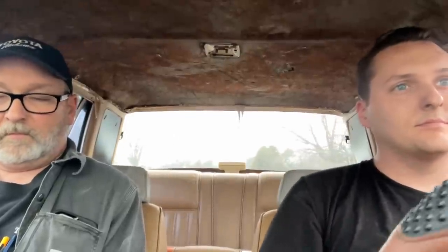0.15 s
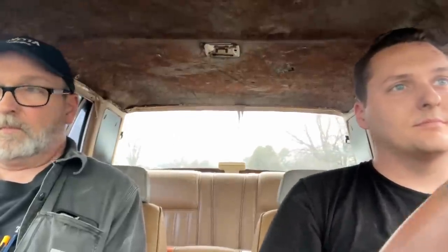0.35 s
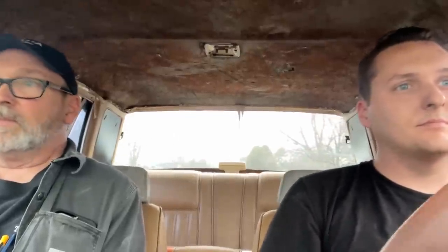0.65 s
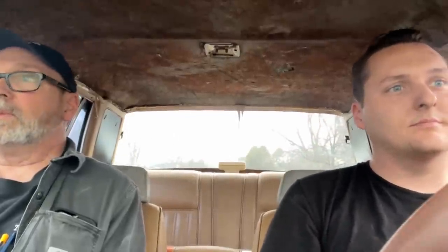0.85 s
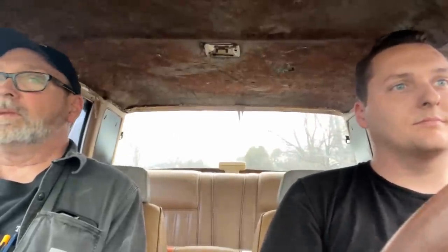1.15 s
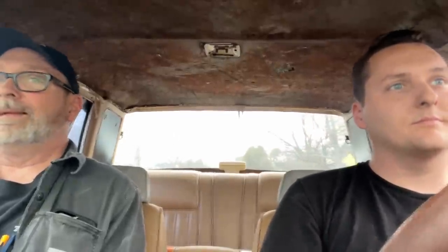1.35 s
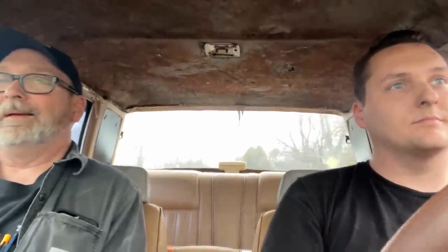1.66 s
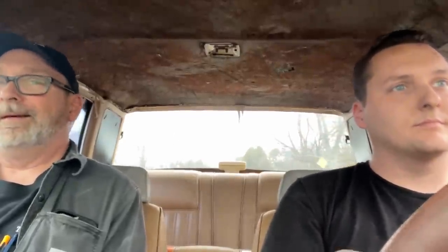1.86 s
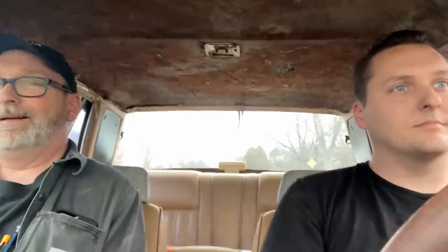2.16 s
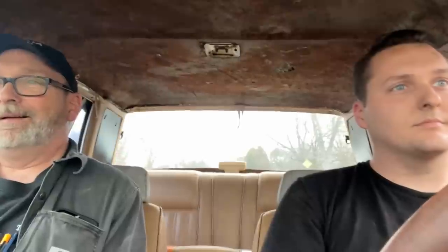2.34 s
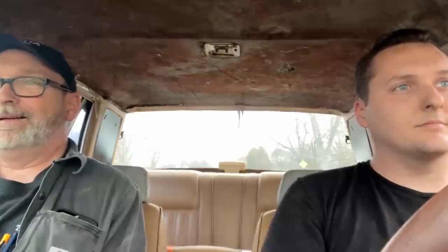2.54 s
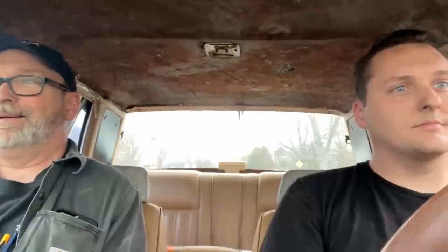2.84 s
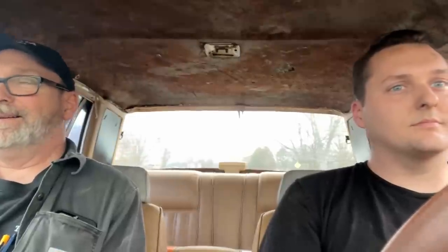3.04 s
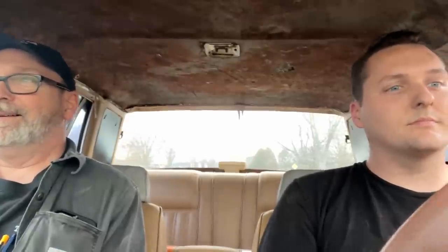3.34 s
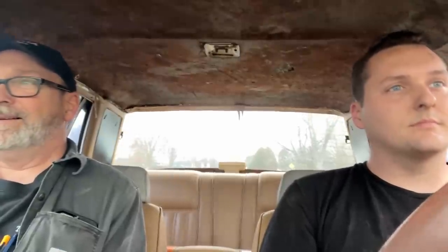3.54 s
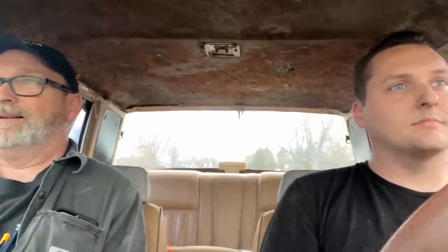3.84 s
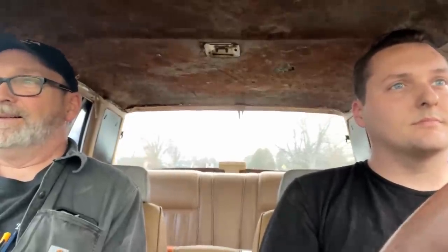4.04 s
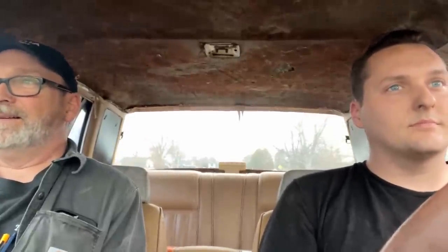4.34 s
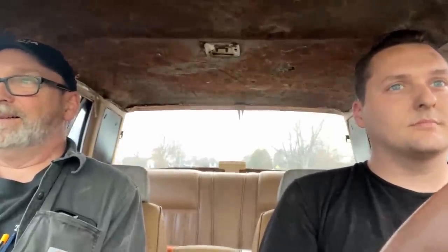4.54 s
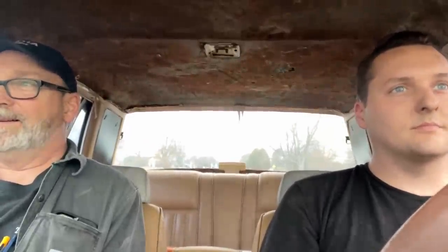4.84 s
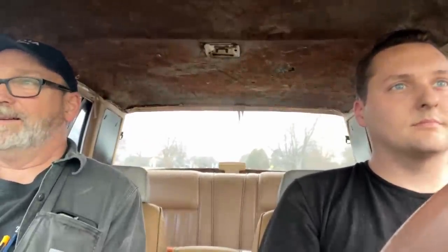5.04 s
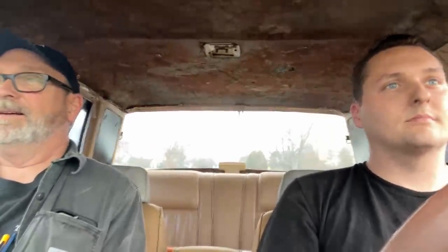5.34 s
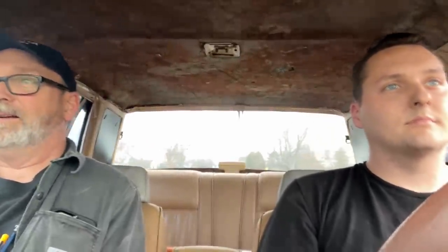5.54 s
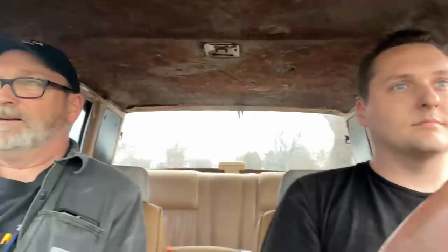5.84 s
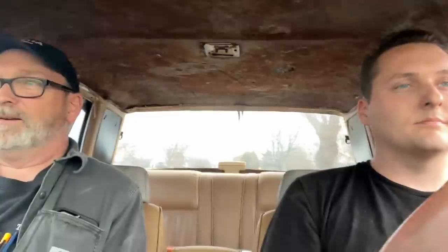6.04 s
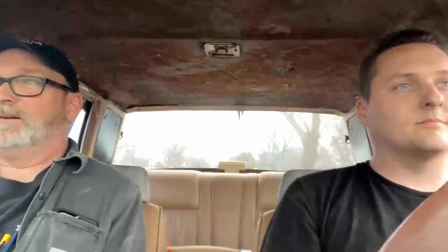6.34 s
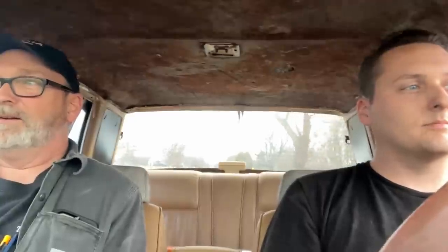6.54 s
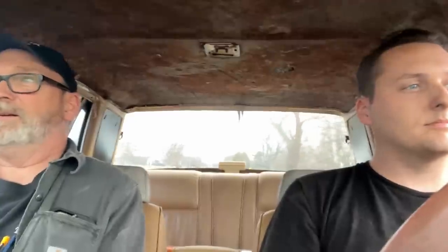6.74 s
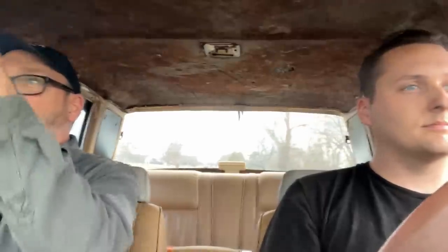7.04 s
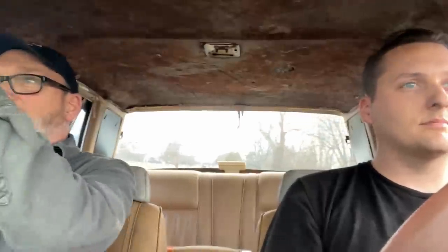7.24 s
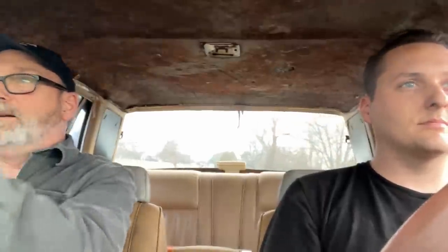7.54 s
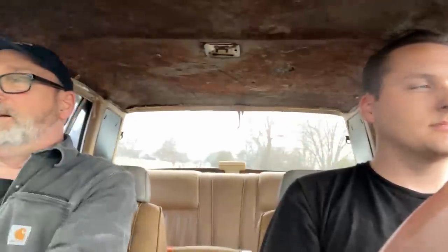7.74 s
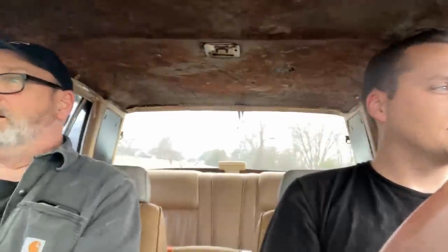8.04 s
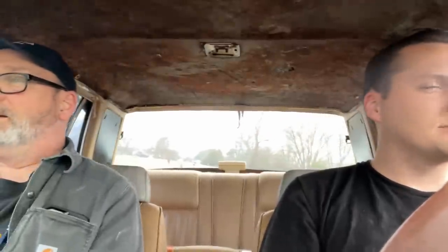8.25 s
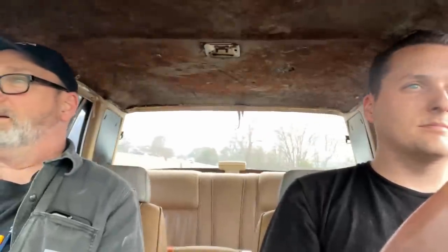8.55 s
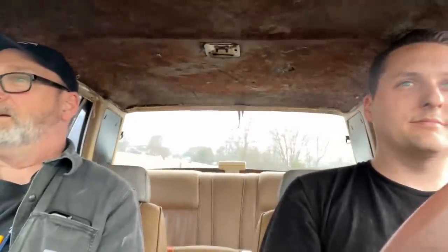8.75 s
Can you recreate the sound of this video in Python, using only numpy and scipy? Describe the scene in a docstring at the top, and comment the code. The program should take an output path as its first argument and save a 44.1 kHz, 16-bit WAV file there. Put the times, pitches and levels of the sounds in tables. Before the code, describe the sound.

Heard from inside the boxy, worn cabin of an old eight-cylinder car, in wide close stereo. From 0 s the engine labours at low revs: a deep, almost pure boom, lumpy uneven rumble, dull body knocks and a leaky exhaust joint puffing and ticking about eleven times a second. The hardest puffs come in the first second. Revs climb steadily, nearly doubling in pitch by 4.9 s; the puffs run closer together into a rough flutter and the growl thickens. Between 4.9 and 5.25 s the gear changes up: pitch slides down quickly by over a third and the boom ducks briefly. From 5.3 s the engine pulls again, gentler and with less hiss, creeping up slowly until the end near 8.9 s, with a few stronger puffs around 6, 7.3 and 8.1 s. Low, slowly patchy road rumble lies underneath throughout, swelling slightly near the end.

```python
"""Inside the cabin of an old eight-cylinder car that pulls away, changes up one gear and pulls on more gently.
For five seconds the revs climb: the firing rate booms as a near sine, uneven cylinders rumble on the other
multiples of the engine cycle, a leaky exhaust joint puffs and ticks once a cycle, and firings knock the body.
At the change the revs fall and the boom ducks; then all climbs again, slower, with a gentler rumble balance.
Road noise, filtered and slowly patchy, fills the gaps throughout."""
import sys
import numpy as np
from scipy import signal
from scipy.fft import rfft, irfft, next_fast_len
from scipy.io import wavfile

SR = 44100
rng = np.random.default_rng(int(sys.argv[2]) if len(sys.argv) > 2 else 0)


def put_to_file(sound):
    """Save the sound as 16-bit audio at rate SR, in the file named by the first command-line argument."""
    columns = np.atleast_2d(sound).T  # one column per channel
    safe = np.clip(columns, -1, 1)
    whole_steps = np.round(safe * 32767)
    wavfile.write(sys.argv[1], SR, whole_steps.astype(np.int16))


N = 392049

# engine speed: (time [s], speed [cycles per s])
SPEED = [(0, 10.7), (.2, 10.5), (.5, 11.05), (.8, 11.71), (1, 12.51), (1.2, 12.82), (1.6, 13.8),
         (2.4, 15.63), (2.8, 16.45), (3.8, 18.86), (4.87, 21.04), (5, 20.17), (5.12, 18.38), (5.18, 16.43),
         (5.245, 13.6), (5.3, 13.55), (5.42, 13.68), (6.1, 14.07), (6.85, 14.61), (8.5, 15.61),
         (8.89, 15.75)]
START_CYCLE = -.117   # where the crank stands at the start [cycles]


def crank(now):
    """The engine speed, and the crank position as its running sum in cycles."""
    speed = np.interp(now, *np.transpose(SPEED))
    cycle = START_CYCLE + np.cumsum(speed) / SR
    return cycle, speed


# the drive: (time [s], load on the boom [dB], rumble level [dB], hiss level before a 6 dB lift [dB])
DRIVE = [(0, -1.5, -1.5, -43), (0.499, -3.5, -2, -43.5), (0.901, -4, -5.5, -46), (1.301, -2, -1.5, -44.5),
         (1.9, -1, -3.5, -47), (2.6, 1, 1.2, -46), (3.399, 9, 1.5, -46), (3.698, 4, 0.5, -44.5),
         (4.3, 9, 0.5, -45), (4.901, 6, -1, -43.5), (5.077, 6.5, -1, -45), (5.181, -15, -0.5, -49.5),
         (5.26, -5, -5.5, -50), (5.499, -3.5, -5, -49.5), (6.501, -3.5, -5, -49.5), (7.801, -3, -3, -48.5),
         (8.2, -4, -1.2, -49), (8.89, -9, -0.5, -49)]


def drive(now):
    """Effort of the engine as three level curves in dB: boom load, rumble and hiss."""
    time, *columns = np.transpose(DRIVE)
    return [np.interp(now, time, column) for column in columns]


# strength of each firing in order: [share]
CYLINDERS = [.89, .5, 1.09, 1.2, .88, .65, .78, .72]
# what the cabin makes of the firing rate; it swallows the boom near 128 Hz:
# (frequency [Hz], level alike in both ears [dB], level in opposition [dB], lead of the opposed part [rad])
BOOM = [(74.5, -14, -37, 2.5), (92.8, -8, -30.5, -9.5), (113.8, -13.5, -38, -1), (119.2, -16.5, -36, -0.5),
        (125.74, -25, -34.5, 0.2), (126.8, -37.5, -31, -1), (134, -35, -32, -2.5), (142, -34.5, -37, -3),
        (154.3, -28.5, -45, -1), (150, -30, -38, -4), (163, -33.5, -35, 1)]
# the boom leads its neighbouring lines: (frequency [Hz], lead [rad])
BOOM_TURN = [(90, 1.5), (102, 2), (123, 1.5), (130, 2.2), (141, 1.9), (147, 2.5), (153, 3.6)]
# the cabin's resonances delay each pitch, for boom and rumble: (frequency [Hz], phase [rad])
CABIN_TURN = [(30.0, 6.6), (60.0, 7.2), (90.0, 3.3), (110.0, -0.8), (125.0, -3.9), (140.0, -3.4),
              (155.0, -6.9), (185.0, -10.1), (207.0, -15.0), (225.0, -23.1), (245.0, -24.9), (265.0, -28.3),
              (285.0, -30.1), (310.0, -33.1), (340.0, -38.6), (375.0, -40.2), (400.0, -39.7),
              (430.0, -39.4), (470.0, -32.8), (510.0, -42.5), (555.0, -43.3), (600.0, -46.7),
              (800.0, -70.6)]


def boom(cycle, speed, load_db):
    """Eight firings a cycle: a near sine that stands in the cabin."""
    hz = len(CYLINDERS) * speed
    boom_hz, *columns = np.transpose(BOOM)
    mid_db, side_db, lead = [np.interp(hz, boom_hz, column) for column in columns]
    turn = 2 * np.pi * len(CYLINDERS) * cycle + at_hz(CABIN_TURN, hz) + at_hz(BOOM_TURN, hz)
    # load and drift move only the part alike in both ears
    mid = from_db(mid_db + load_db + 0.56 * drift(7.9)) * np.cos(turn)
    side = from_db(side_db) * np.cos(turn + lead)
    return np.sqrt(2) * np.array([mid + side, mid - side])


# speeds at which the hard-pulling rumble is set: [cycles per s]
RUMBLE_SPEEDS = [11, 16, 21]
# lines besides the firing rate, relative to the cabin spectra: (multiple of the engine cycle,
# level pulling hard at each of the three RUMBLE_SPEEDS [dB], level pulling gently [dB])
RUMBLE = [(2, -2.3, 4, -1, -4.5), (3, -5, -0.5, -11, -6.5), (4, -2, -4.5, -1, -10), (5, 3.5, 4, 6.5, 3),
          (6, -2.5, -1.5, 4.5, -2.5), (7, -7, 6, -2, 2), (9, 2, 2.5, 2, 1), (10, -4, -15.5, 8, -10.5),
          (11, 4, 3, 4.5, 3.5), (12, -0.5, 1.5, 2, 1.6), (13, 4.5, 6.5, 10.5, 5.5), (14, -3.5, -3, 5, 0.2),
          (15, 3.9, -1.8, -3, 6.5), (16, 0, 7.5, 0.8, 1.9), (17, -5, 3.5, -14, 2), (18, -5, -2.5, 0.2, -6),
          (19, 12.5, -3, 1.5, -1.5), (20, 6, -18.5, -12.5, -8.5), (21, 2, 4.5, 4, 4.1),
          (22, 6.5, -3.5, 2, -2.5), (23, 3.5, -6, -5.5, -5), (24, 2, 4.8, -4.5, 2.9),
          (25, -3, -6.6, -0.5, -3), (26, -3.0, 1, -2.5, -5), (27, 1.6, -7, 1.8, 0.5),
          (28, -3.5, -4, 0.5, -9), (29, -4.5, 1, 11, 0.5), (30, -2, -2, 9.5, -1.6),
          (31, -13, -3.2, 10, -7.5), (32, -20.5, -3, 3.1, -3.5), (33, 0, -6, -4, -0.5),
          (34, 2.5, -7, 11, -8.5), (35, -3.7, -3.5, 14, -4), (36, 4.5, -3, 16, -4.2),
          (37, -5, -11.5, 3, -0.5), (38, -5, 2.5, 16.5, 4.5), (39, -12.5, -0.2, 11, 2.2),
          (40, 7, 4, 8, 2.5), (41, 5.7, 2.5, 15, 2.5), (42, -3.2, 7.5, 8, 1), (43, -10, 1.5, 9, 5),
          (44, -2, 2.5, 12, 3.5), (45, -1.5, -6.3, -7, -9), (46, -4, 0, -7.5, 0.5), (47, 3, 2.5, 5.5, 3.5),
          (48, -4, -3, -2.5, -1.5), (49, 1, 14, -6, 10), (50, 1, 15.5, -12, 9)]
# what the cabin passes to both ears alike: (frequency [Hz], level [dB])
CABIN_MID = [(30.0, -55.5), (45.0, -49), (60.0, -36), (75.0, -37), (90.0, -30), (105.0, -29.0),
             (125.0, -42.5), (140.0, -39.5), (155.0, -35), (172.0, -39.5), (190.0, -39), (207.0, -46),
             (225.0, -47), (245.0, -45.5), (262.0, -38), (280.0, -38), (300.0, -42), (325.0, -45),
             (350.0, -46.5), (380.0, -43), (410.0, -54.5), (440.0, -51.5), (470.0, -55.5), (500.0, -71.5),
             (530.0, -58.5), (555.0, -54.5), (590.0, -72.5), (630.0, -68), (680.0, -73), (730.0, -72),
             (775.0, -71.5), (830.0, -82), (900.0, -79.5), (970.0, -81.5), (1050.0, -79)]
# what it passes to the ears in opposition: (frequency [Hz], level [dB])
CABIN_SIDE = [(30.0, -74.5), (45.0, -63), (60.0, -61.5), (75.0, -51), (90.0, -48), (105.0, -39),
              (125.0, -45.5), (140.0, -45), (155.0, -39.5), (172.0, -41.5), (190.0, -40.5), (207.0, -45.5),
              (225.0, -48), (245.0, -54.5), (262.0, -56.5), (280.0, -52.5), (300.0, -50.5), (325.0, -42),
              (350.0, -40), (380.0, -49), (410.0, -45.5), (440.0, -46.5), (470.0, -49.5), (500.0, -49.5),
              (530.0, -51), (555.0, -49), (590.0, -61.5), (630.0, -66), (680.0, -58.5), (730.0, -62.5),
              (775.0, -64), (830.0, -67.5), (900.0, -72), (970.0, -60), (1050.0, -56)]
# lead of the opposed part: (frequency [Hz], lead [rad])
SIDE_LEAD = [(75, -1.5), (95, -2.1), (125, -.9), (140, -2.7), (165, -1.8), (200, -2.7), (225, -4.1),
             (290, -4.5), (350, -4.9), (380, -1.4), (420, -3.6), (500, -3.1), (555, -1.1)]
SHIFT_S = 5.2   # the higher gear takes hold [s]


def rumble(cycle, speed, level_db):
    """Unequal firings put a line on other multiples of the cycle; firing pattern and cabin set their phases."""
    pattern = np.angle(np.fft.fft(CYLINDERS))
    step = 8   # the lines are low, so build them at an eighth of the sample rate
    cycle, speed = cycle[::step], speed[::step]
    mid, side = 0, 0
    gentle = np.interp(np.arange(0, N, step) / SR, [SHIFT_S - .1, SHIFT_S + .1], [0, 1])
    for k, *hard_db, gentle_db in RUMBLE:
        k = round(k)
        hz = k * speed
        hard_db = np.interp(speed, RUMBLE_SPEEDS, hard_db)
        line_db = hard_db + gentle * (gentle_db - hard_db)
        # no two cycles burn alike, the high lines show it most
        line_db = line_db + (.4 + .03 * k) * drift(3.0, step)
        waver = .004 * k * drift(4, step)
        turn = 2 * np.pi * k * cycle + pattern[k % 8] + at_hz(CABIN_TURN, hz) + waver
        mid = mid + from_db(line_db + at_hz(CABIN_MID, hz)) * np.cos(turn)
        side = side + from_db(line_db + at_hz(CABIN_SIDE, hz)) * np.cos(turn + at_hz(SIDE_LEAD, hz))
    both = signal.resample_poly([mid + side, mid - side], step, 1, axis=1)[:, :N]
    return np.sqrt(2) * from_db(level_db) * both


# colour of the hiss, relative: (frequency [Hz], level per Hz [dB])
HISS = [(290, -29.5), (500, -2.5), (610, -5.5), (777, -2.5), (1020, -12), (1350, -6.5), (1540, -15),
        (2430, -14), (2900, -18.5), (3920, -22.5), (5600, -21.5), (6600, -28), (7420, -29), (8490, -18),
        (9300, -36.5), (10500, -65), (13000, -73), (14500, -43)]
# how much each puff lifts the hiss at full depth, and how it lingers:
# (frequency [Hz], lift [dB], delay [cycles], fall [cycles])
PUFF_LIFT = [(500, 15.5, -0.015, 0.66), (895, 13.5, -0.082, 0.1), (1400, 12, -0.067, 0.26),
             (2400, 8.5, -0.0064, 1), (3800, 16.5, -0.0088, 0.36), (5950, 13, 0.089, 0.49),
             (8600, 9.5, 0.11, 0.057)]
# puffs stand out less at high revs, where they run together: (speed [cycles per s], depth [share])
PUFF_DEPTH = [(10, 0.53), (14, 0.55), (17.5, 0.49), (21, 0.31)]
# the hardest puffs: (time [s], peak level that sets their extra strength [dB])
HARD_PUFFS = [(0.1062, -30.5), (0.3925, -30), (0.6584, -29.5), (0.834, -30), (0.9168, -30.5), (1.8238, -32),
              (1.9604, -29.5), (3.032, -30), (5.7478, -37), (6.0362, -33.5), (7.2809, -32), (8.1439, -34.5)]
# panels that each puff sets ringing, relative: (frequency [Hz], level [dB], t60 before a 0.06 s cap [s])
PANELS = [(1370, 6.5, 0.082), (1586, -4, 0.04), (1783, 1.5, 0.074), (2074, -4.5, 0.046), (2394, -2.5, 0.12),
          (2860, 2, 0.013), (3475, -2, 0.084), (3685, -4, 0.041), (4715, -7.5, 0.055), (5290, -15.5, .02),
          (5606, -3, 0.037), (6070, -6.5, 0.042), (6390, -4.5, 0.02)]
USUAL_PEAK_DB = 13   # allowance for an ordinary peak over the hiss level [dB]
TAP_DB, TAP_AT = 21, .04   # valve tap just before each puff's top: strength [dB], place [share of a cycle]


def leak(cycle, speed, level_db):
    """Hiss that swells once a cycle, each puff with its own strength and colour, and panels rung by the puff."""
    number = (cycle - PUFF_AT + 1.1).astype(int)   # counts on a tenth of a cycle before each puff
    depth = np.interp(speed, *np.transpose(PUFF_DEPTH))
    strength = 1 + .12 * rng.standard_normal(number[-1] + 1)
    hard_db = np.zeros(len(strength))
    for time, peak_db in HARD_PUFFS:
        at = int((time + .01) * SR)
        hard_db[number[at]] = max(peak_db - level_db[at] - USUAL_PEAK_DB, 0)
    strength = strength + .03 * hard_db

    lift_hz, *columns = np.transpose(PUFF_LIFT)
    hiss = 0
    for hz, band in noise_bands(HISS, 440.0, count=16):
        lift_db, delay, fall = [np.interp(np.log(hz), np.log(lift_hz), column) for column in columns]
        colour = strength + .24 * rng.standard_normal(len(strength))
        hiss = hiss + band * from_db(lift_db * depth * swell(cycle, delay, fall) * colour[number])
    hiss = rms_one(hiss)

    puff = swell(cycle, 0, PUFF_FALL)
    taps = np.flatnonzero(np.diff(np.floor(cycle - TAP_AT)))
    for hz, panel_db, t60 in PANELS:
        chance_db = 3.5 * np.clip(rng.standard_normal(len(strength)), -3, 1.5)
        blow = from_db(hard_db + chance_db)[number]
        force = rng.standard_normal((2, N)) * (.06 + depth ** 2 * puff ** 3) * blow
        # each tap pushes the two channels in opposite directions
        force[:, taps] += from_db(TAP_DB) * (depth ** 2 * blow)[taps] * [[1], [-1]]
        hiss = hiss + from_db(panel_db - 17.5) * ring(force, hz, min(t60, .06))
    return from_db(level_db + 6.0) * two_ears(*hiss)


PUFF_AT, PUFF_RISE, PUFF_FALL = -0.11, 0.11, 0.19   # start, rise and fall [shares of a cycle]


def swell(cycle, delay, fall):
    """One puff a cycle: a quick rise and a slower fall, top 1."""
    since = (cycle - PUFF_AT - delay) % 1
    shape = (1 - np.exp(-since / PUFF_RISE)) ** 2 * np.exp(-since / fall)
    return shape / shape.max()


# body panels that the firings knock: (frequency [Hz], level before the soft cut and drive [dB], t60 [s])
BODY = [(203.6, -47, 0.17), (271.3, -48.5, 0.093), (390, -48.5, 0.13), (420, -52, 0.035), (476, -57, 0.044),
        (553, -52.5, 0.088), (650, -62, 0.13), (748, -51, 0.077), (789.4, -50.5, 0.18), (890, -67, 0.041),
        (971.5, -58, 0.22)]
# how hard each firing in order knocks them: [dB]
KNOCK_DB = [-6, -9, 0.5, -4, -9, -3, -9, 0.5]
# the engine knocks hardest while it labours at low revs: (speed [cycles per s], level [dB])
LABOUR = [(10.6, 3), (11.7, 4.5), (12.8, -1), (13.8, 1.5), (16, -1), (21, -5.5)]
KNOCK_SPREAD_DB, KNOCK_JITTER_S = 2.2, .0002   # chance in strength [dB] and in timing [s]
KNOCK_CUT_HZ = 2500   # the blows are soft [Hz]


def knocks(cycle, speed, level_db):
    """Every firing strikes the body panels, each panel a little differently every time."""
    firing = np.floor(cycle * len(KNOCK_DB)).astype(int)
    at = np.flatnonzero(np.diff(firing)) + 1
    firing_db = np.array(KNOCK_DB)[firing[at] % len(KNOCK_DB)]
    out = 0
    for hz, panel_db, t60 in BODY:
        blows = np.full((2, N), 1e-18)
        chance = rng.standard_normal((len(at), 4))   # timing for two channels, then strength for two
        for ear in (0, 1):
            late = (KNOCK_JITTER_S * SR * chance[:, ear]).astype(int)
            when = np.clip(at + late, 0, N - 1)
            blows[ear, when] = from_db(firing_db + KNOCK_SPREAD_DB * chance[:, 2 + ear])
        out = out + from_db(panel_db) * ring(blows, hz, t60)
    out = signal.sosfilt(signal.butter(4, KNOCK_CUT_HZ, fs=SR, output="sos"), out)
    labour_db = np.interp(speed, *np.transpose(LABOUR))
    return from_db(level_db - level_db.mean() + labour_db) * two_ears(*out)


# colour of the road noise, relative: (frequency [Hz], level per Hz [dB])
ROAD = [(25, -21), (38, -8.5), (50, -2.5), (70, -2.5), (110, -12), (170, -13), (260, -10), (330, -14),
        (400, -19), (500, -27), (600, -31), (900, -36), (1500, -38), (2500, -54.5)]
# tyre drone below the split, engine-shaken body noise above, each scaling the colour above:
# (time [s], drone level [dB], body noise level [dB])
ROAD_DB = [(0, -35.5, -22.5), (.3, -38, -23.5), (1.3, -38, -27), (3, -33.5, -33.5), (4.9, -32, -26),
           (5.5, -33.5, -35.5), (6.2, -35, -36.5), (7.001, -37.5, -39.5), (8.89, -32.5, -30)]
ROAD_SPLIT_HZ = 95   # [Hz]


def road():
    """Tyre drone and body noise: third-octave noise bands, slowly patchy."""
    time, *columns = np.transpose(ROAD_DB)
    drone, body = [from_db(np.interp(np.arange(N) / SR, time, column)) for column in columns]
    bands = [(hz, band * from_db(1.4 * drift(5.7))) for hz, band in noise_bands(ROAD, 23.28, count=20)]
    whole = np.std(sum(band for hz, band in bands))
    mix = sum(band * (drone if hz < ROAD_SPLIT_HZ else body) for hz, band in bands)
    return two_ears(*mix) / whole


# how the two ears relate:
# (frequency [Hz], left-right likeness [0-1], left lead [rad], left minus right level [dB])
LIKENESS = [(60, 0.995, 0.1, 0), (172, 0.45, 0.2, -0.4), (270, 0.75, 0.2, -0.5), (340, 0.3, 0.2, -0.7),
            (400, 0.55, 3.0, -0.7), (560, 0.7, 3.0, -0.7), (861, 0.58, 3.0, -0.9), (1378, 0.63, -2.1, 0.1),
            (1894, 0.46, -2.7, 0.2), (2411, 0.45, -0.0, 1.3), (2928, 0.06, 1.2, 1.7),
            (3617, 0.1, -1.3, 1.1), (4306, 0.17, 0.1, -0.5), (4995, 0.12, 2.9, -4.0),
            (6029, 0.47, -1.8, -3.8), (7235, 0.09, -2.6, 5.1), (8268, 0.85, -2.1, 2.3),
            (9474, 0.77, -2.9, 0.3)]


def two_ears(near, other):
    """Left and right share part of a sound, turned in phase; the rest of the right ear comes from the other."""
    size = next_fast_len(N)
    hz, alike, lead, balance_db = np.transpose(LIKENESS)
    grid = np.arange(size // 2 + 1) * SR / size
    shared = np.interp(grid, hz, np.clip(alike, 0, 1) * np.exp(-1j * lead))
    tilt = from_db(np.interp(grid, hz, balance_db) / 2)
    left, rest = rfft(near, size), rfft(other, size)
    right = shared * left + np.sqrt(1 - np.abs(shared) ** 2) * rest
    return irfft([left * tilt, right / tilt], size)[:, :N]


def noise_bands(spectrum, low_hz, count):
    """Third-octave bands of two unrelated noises, each at its level; yields (centre Hz, band)."""
    white = rng.standard_normal((2, 2, N))   # neighbouring bands take turns between two pairs
    edges = low_hz * 2 ** (np.arange(count + 1) / 3)
    for k, (low, high) in enumerate(zip(edges, edges[1:])):
        hz = np.sqrt(low * high)
        sos = signal.butter(2, [low, high], "band", fs=SR, output="sos")
        yield hz, from_db(at_hz(spectrum, hz)) * signal.sosfilt(sos, white[k % 2])


def ring(force, hz, t60):
    """One mode driven by a force: a two-pole resonance that falls 60 dB in t60; unit power."""
    r, w = from_db(-60 / (t60 * SR)), 2 * np.pi * hz / SR
    return rms_one(signal.lfilter([1, 0, -1], [1, -2 * r * np.cos(w), r * r], force))


def drift(rate, step=1):
    """Slow chance of spread 1: sparse noise through a double one-pole low-pass, read at every step-th sample."""
    r = np.exp(-200 * np.pi * rate / SR)   # rate in Hz; one noise value per 100 samples
    slow = signal.lfilter([1], [1, -2 * r, r * r], rng.standard_normal(N // 100 + 1002))[1000:]
    return np.interp(np.arange(0, N, step) / 100, np.arange(len(slow)), rms_one(slow))


def at_hz(points, hz):
    """Read a spectrum on a log-frequency axis."""
    point_hz, value = np.transpose(points)
    return np.interp(np.log(hz), np.log(point_hz), value)


def rms_one(x):
    """Scale to unit power."""
    return x / np.sqrt(np.mean(x ** 2) + 1e-20)


def from_db(db):
    """Decibels to gain."""
    return 10 ** (np.asarray(db) / 20)


def scene():
    """Crank and drive lead every engine sound; the road lies underneath."""
    now = np.arange(N) / SR
    cycle, speed = crank(now)
    load_db, rumble_db, hiss_db = drive(now)
    engine = boom(cycle, speed, load_db) + rumble(cycle, speed, rumble_db)
    engine = engine + knocks(cycle, speed, hiss_db)   # the knocks rise and fall with the hiss curve
    return engine + road() + leak(cycle, speed, hiss_db)


CUTOFF_HZ = 15800   # [Hz]


def record(dry):
    """Peaks are rounded a little, the top is cut."""
    rounded = 0.95 * np.tanh(dry / 0.79)
    return signal.sosfilt(signal.cheby2(12, 70, CUTOFF_HZ, fs=SR, output="sos"), rounded)


dry = scene()
out = record(dry)
put_to_file(out)
```